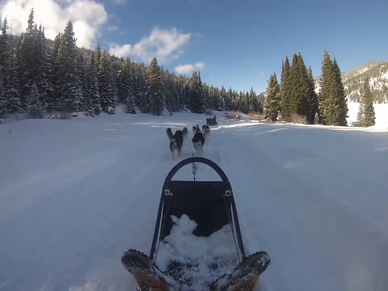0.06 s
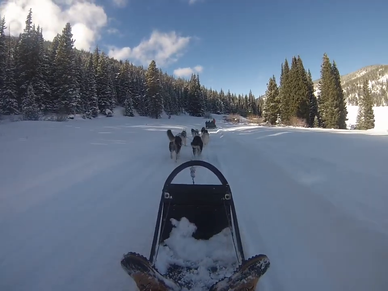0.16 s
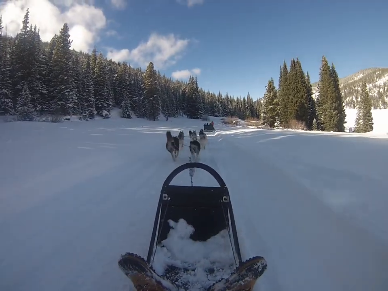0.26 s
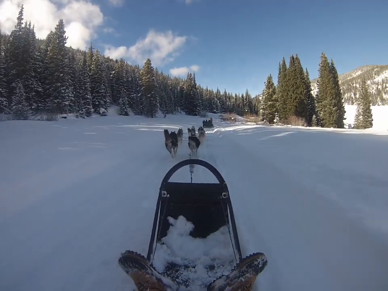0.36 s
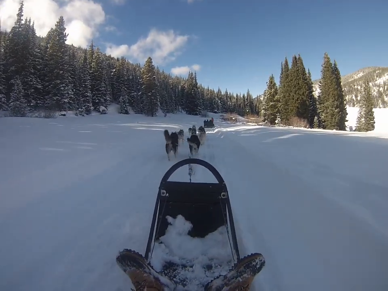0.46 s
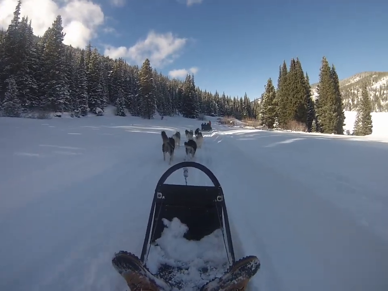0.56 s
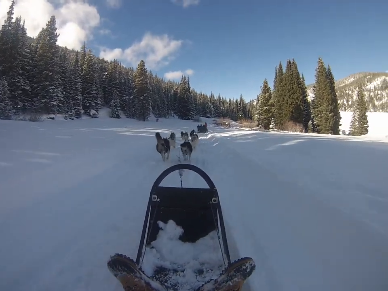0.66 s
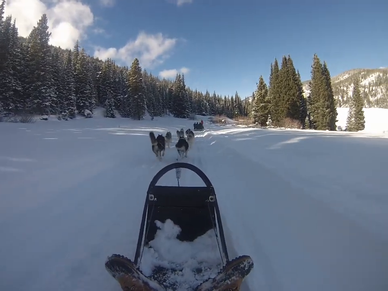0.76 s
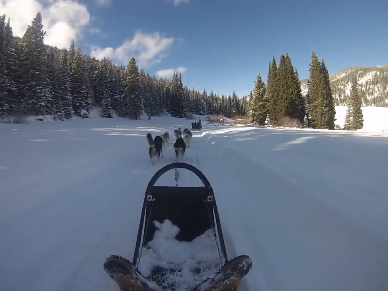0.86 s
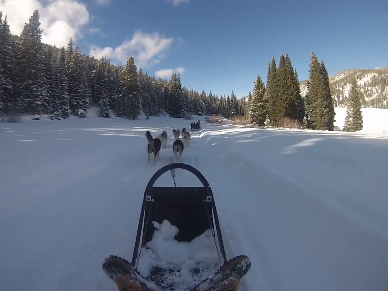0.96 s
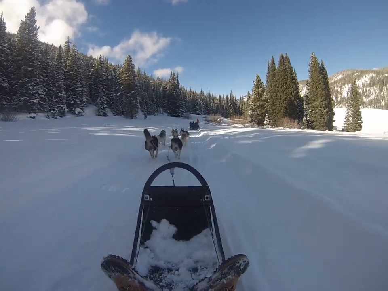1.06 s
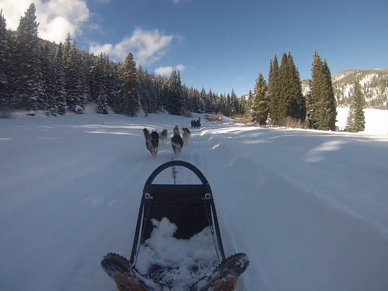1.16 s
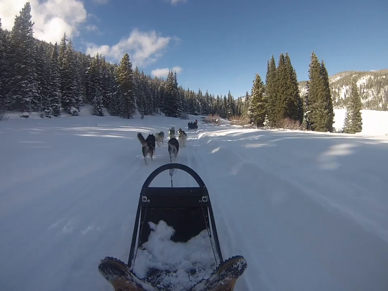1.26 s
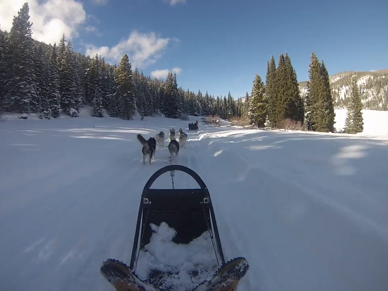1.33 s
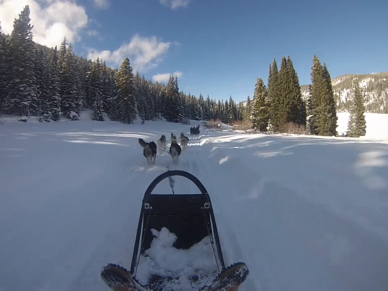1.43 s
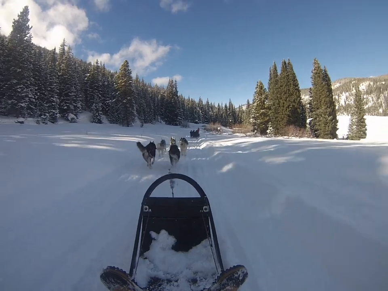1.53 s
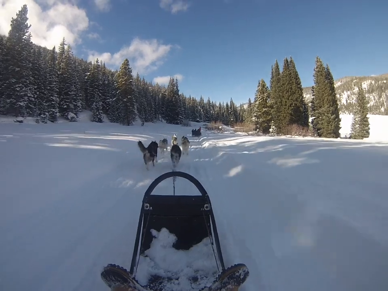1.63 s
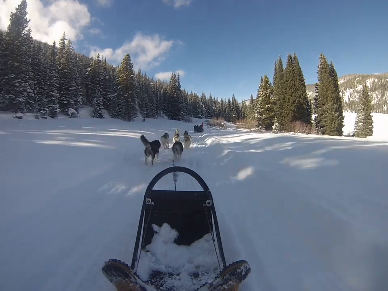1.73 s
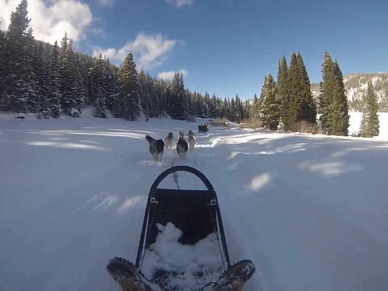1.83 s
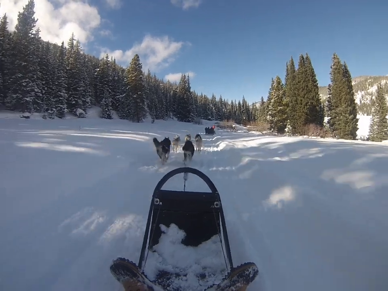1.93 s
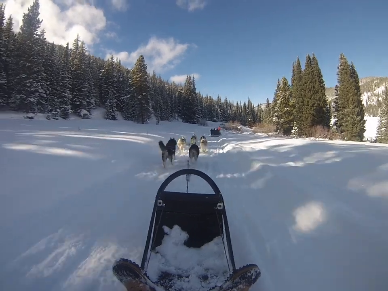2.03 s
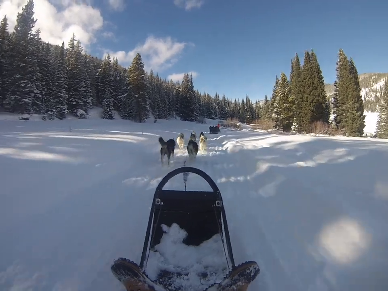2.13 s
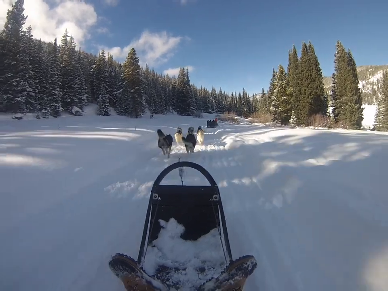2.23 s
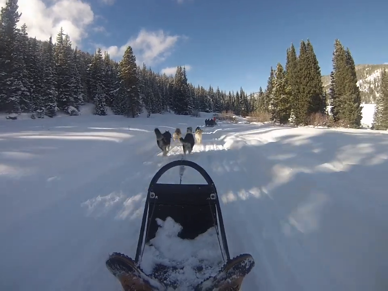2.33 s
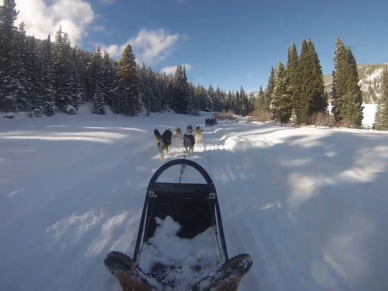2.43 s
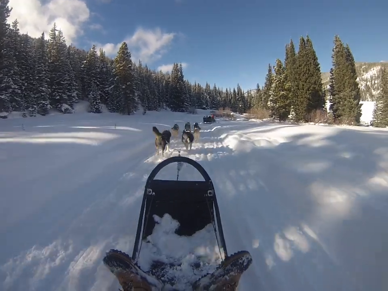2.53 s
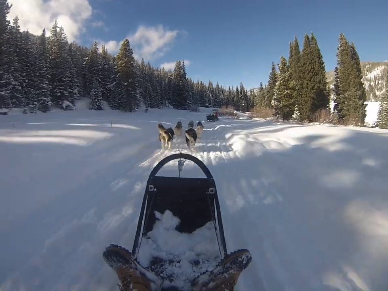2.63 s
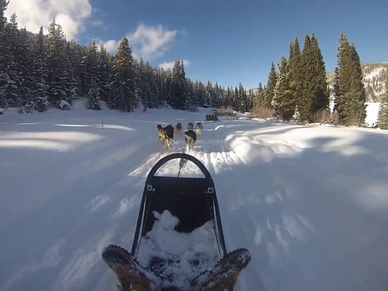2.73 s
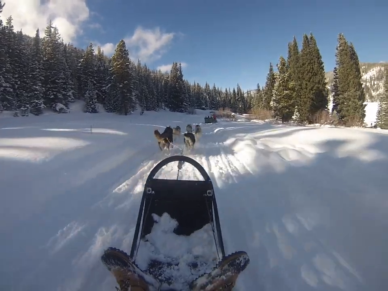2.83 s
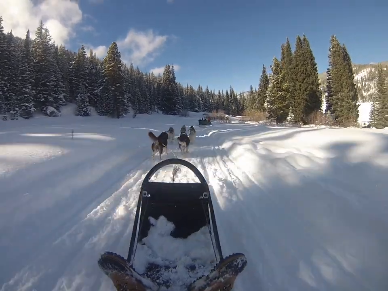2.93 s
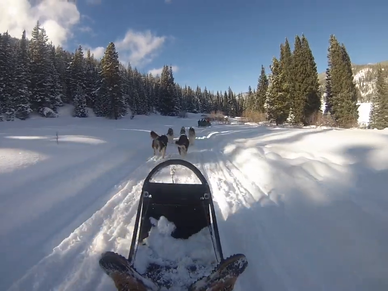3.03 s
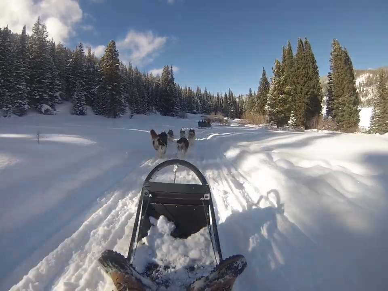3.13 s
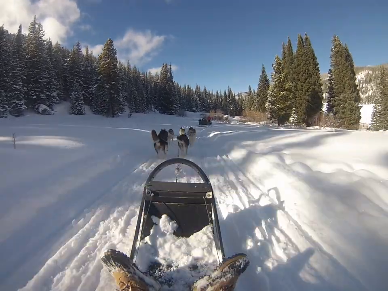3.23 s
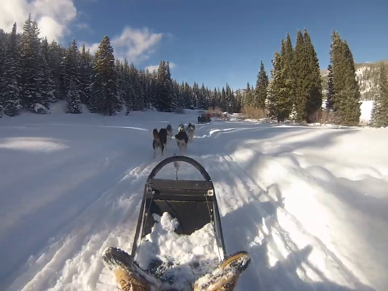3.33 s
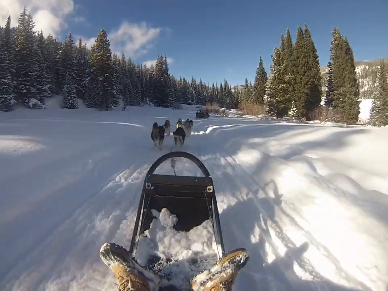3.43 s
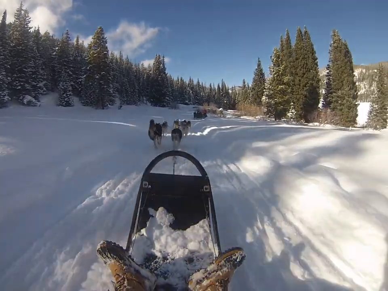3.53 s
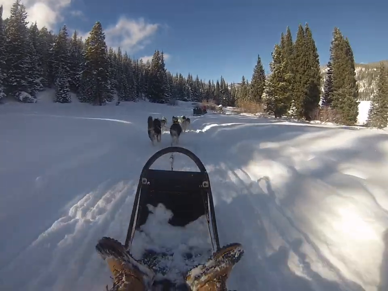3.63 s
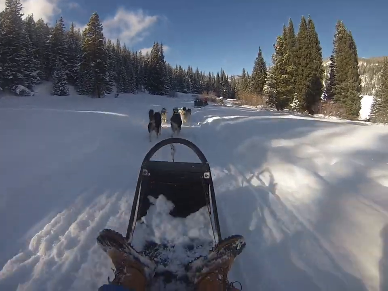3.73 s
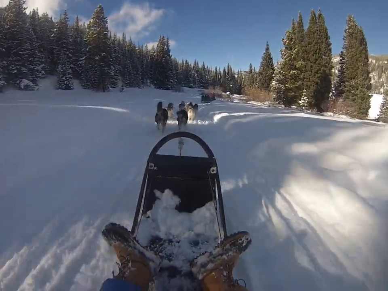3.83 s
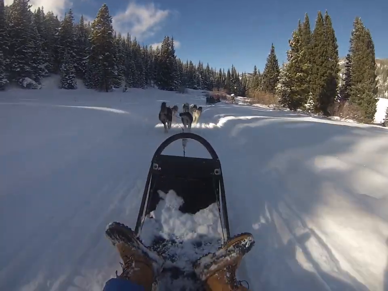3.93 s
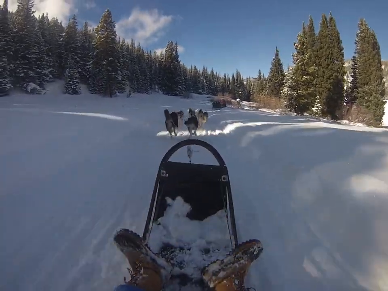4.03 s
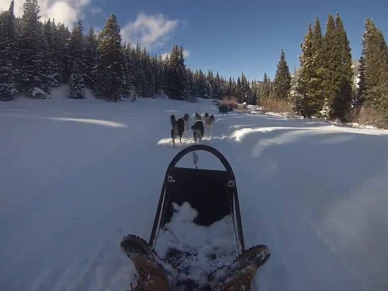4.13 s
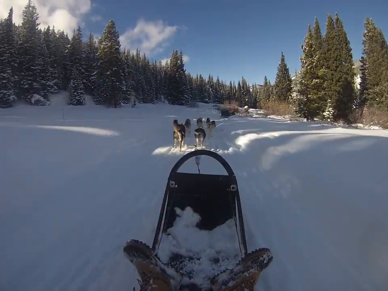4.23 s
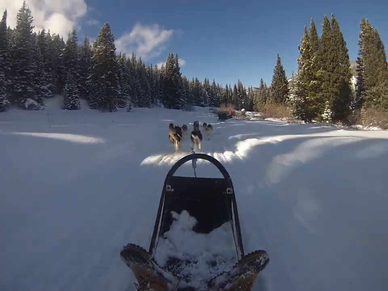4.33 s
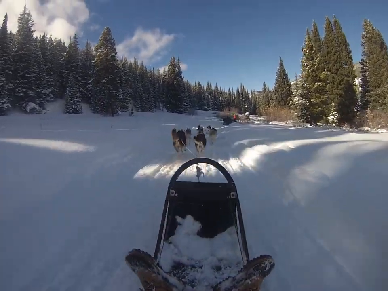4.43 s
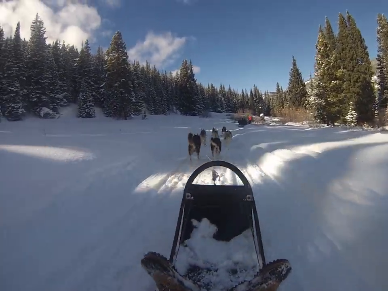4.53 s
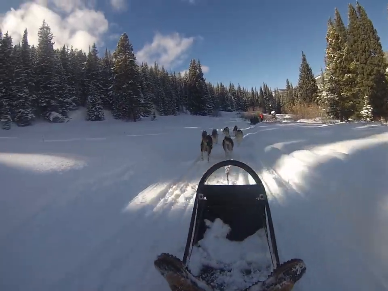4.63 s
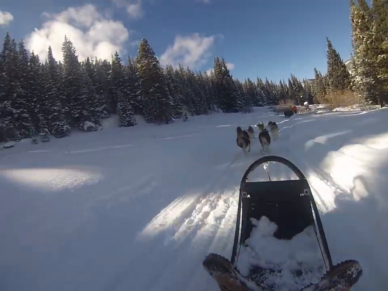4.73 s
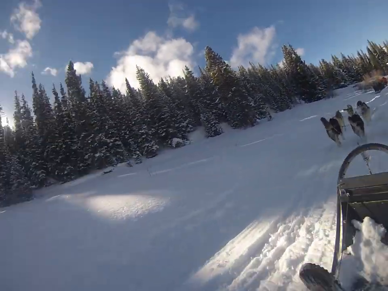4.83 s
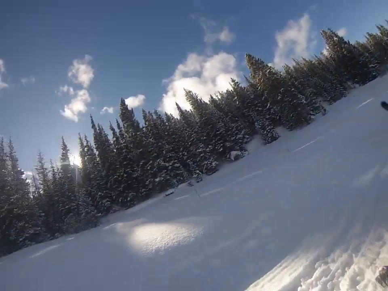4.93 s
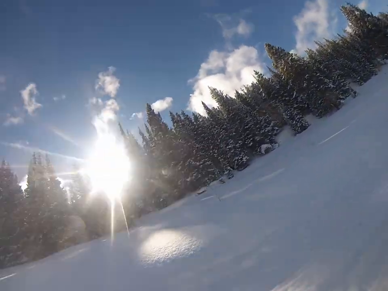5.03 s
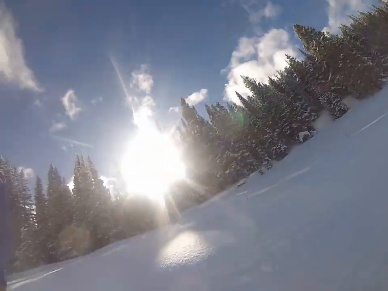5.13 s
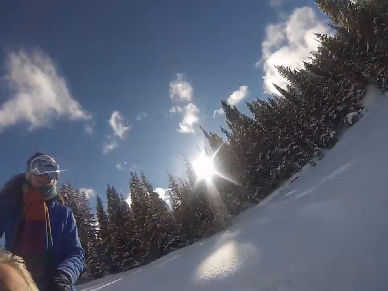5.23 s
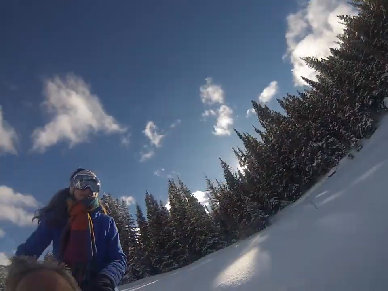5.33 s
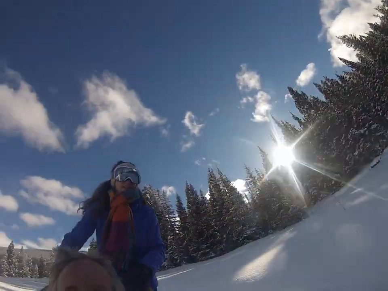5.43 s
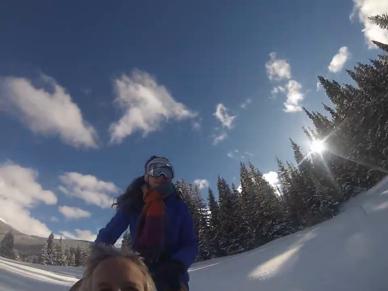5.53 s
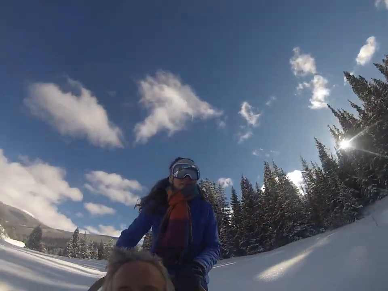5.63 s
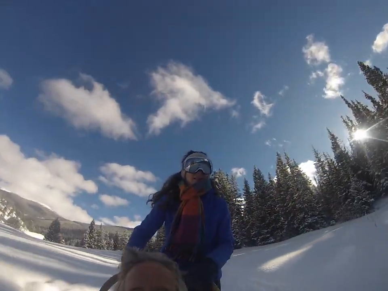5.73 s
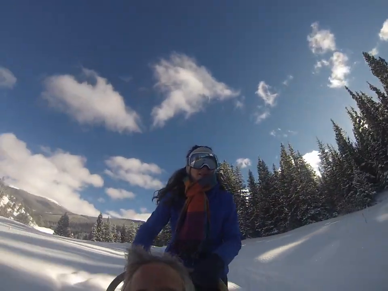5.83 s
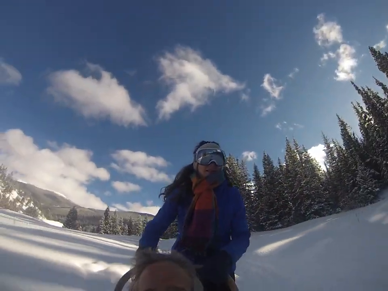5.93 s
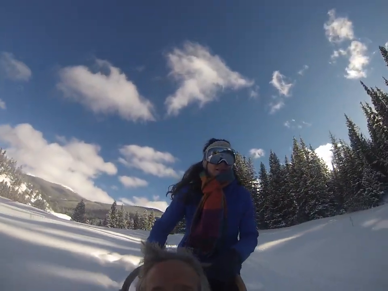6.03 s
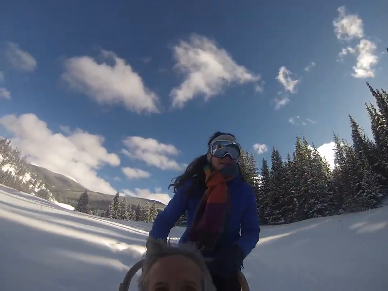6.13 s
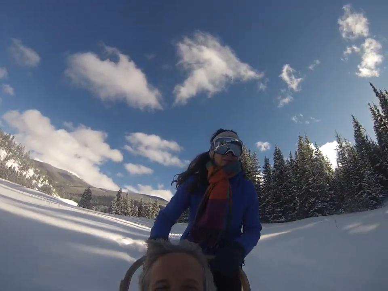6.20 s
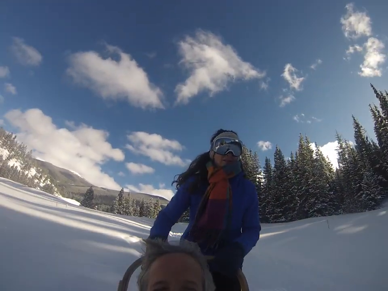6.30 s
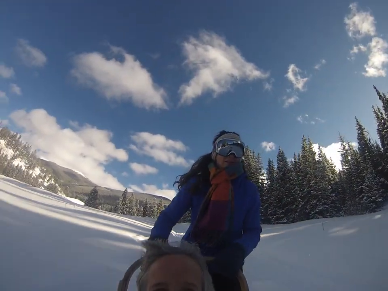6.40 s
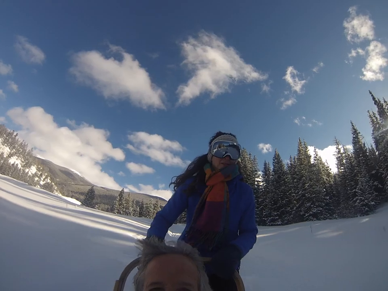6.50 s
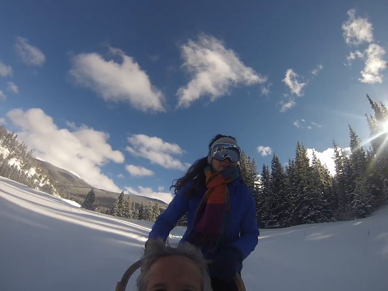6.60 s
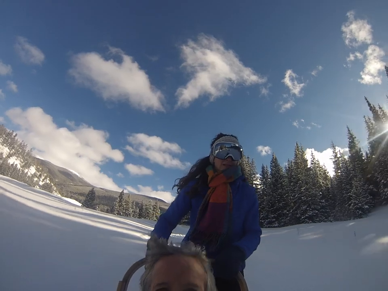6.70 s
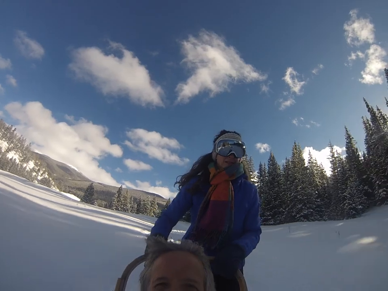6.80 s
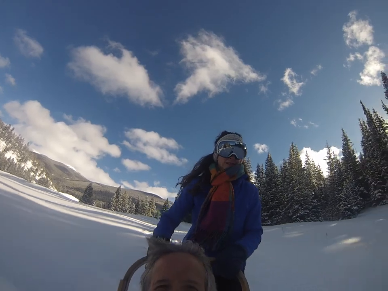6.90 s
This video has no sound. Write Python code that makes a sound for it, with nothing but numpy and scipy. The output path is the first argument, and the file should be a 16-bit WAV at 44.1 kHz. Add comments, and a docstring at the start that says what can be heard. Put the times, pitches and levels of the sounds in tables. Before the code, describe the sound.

A dog sled travels over packed snow, heard close from a small plastic-cased camera on board. For all seven seconds the runners make a grainy, wavering scrape and crunch over a low rumble, with a faint high hiss and tiny ticks. Soft, deep bumps and light knocks on the case come irregularly. Around 1.8 seconds one runner rings faintly on a hard patch.

From about 4.3 seconds the rumble swells as the camera is swung round. Between 4.7 and 6.1 seconds a glove slides, rasps and knocks on the case right at the microphone. Heavy low thumps come with it, loudest at 4.9 and 5.2 seconds, with smaller ones at 5.4 and 5.6. The case creaks briefly at about 6 seconds. The scrape and rumble then continue, slightly softer, with a couple of small bumps and a last light knock near 6.9 seconds.

```python
"""A trail of packed snow, from on board a dog sled; the microphone is in a small plastic-cased camera.
Close by, the runners crush snow grains and the frame rumbles, under a faint hiss with tiny ticks.
Bumps set the camera mount ringing, the case takes a few knocks, and one runner sings on a hard patch.
Near five seconds the camera is swung round to face backwards: right at the microphone a glove slides,
rubs and knocks on the case, which creaks under the fingers as the turn ends."""
import sys
import numpy as np
from scipy import signal
from scipy.fft import rfft, irfft
from scipy.io import wavfile
from scipy.ndimage import uniform_filter1d

SR = 44100
rng = np.random.default_rng(int(sys.argv[2]) if len(sys.argv) > 2 else 0)


def generate_wav(sig):
    """Save sig (samples, or channels by samples) to the path in sys.argv[1] as 16-bit PCM at SR."""
    pcm = np.round(np.clip(np.atleast_2d(sig).T, -1, 1) * 32767).astype(np.int16)
    wavfile.write(sys.argv[1], SR, pcm)


N = 306936
TIME, FREQS = np.arange(N) / SR, np.fft.rfftfreq(N, 1 / SR)
TURN_START_S, TURN_END_S = 4.03, 6.25
TURNED = np.clip((TIME - TURN_START_S) / (TURN_END_S - TURN_START_S), 0, 1)  # 0 ahead, 1 behind

# softer and harder snow under the runners: time_s, scrape_db, crunch_db
SNOW_COURSE = [(0, -54, -57.5), (.2, -55.5, -63.5), (.7, -56.5, -58.5), (.97, -53.5, -57),
               (1.4, -55, -58.5), (1.58, -59, -65), (1.87, -53.5, -60.5), (2.4, -56, -61.5),
               (3.35, -56, -62.5), (3.8, -56.5, -60.5), (4.12, -57.5, -66.5), (4.8, -53.5, -54),
               (5.15, -59.5, -64.5), (5.55, -53.5, -55), (5.95, -57, -56.5), (6.2, -59, -61),
               (6.96, -58.5, -62)]


def gain_of(db):
    """Decibels to amplitude."""
    return 10 ** (np.asarray(db) / 20)


def unit_rms(x):
    """Scales to an rms of one."""
    return x / np.sqrt(np.mean(x ** 2) + 1e-20)


def snow_gains():
    """The scrape and crunch gains along the trail, for every sample."""
    time_s, scrape_db, crunch_db = np.transpose(SNOW_COURSE)
    return gain_of(np.interp(TIME, time_s, scrape_db)), gain_of(np.interp(TIME, time_s, crunch_db))


def add(mix, start_s, sound):
    """Mixes a sound in at a time."""
    part = mix[max(round(start_s * SR), 0):][:len(sound)]
    part += sound[:len(part)]


def drift(rate_hz):
    """Random wandering of rms one, up to about the given rate."""
    return unit_rms(irfft(rfft(rng.standard_normal(N)) / (1 + (FREQS / rate_hz) ** 4), N))


def coloured_noise(spectrum):
    """Noise of rms one, shaped by a smooth spectrum."""
    hz, db = np.transpose(spectrum)
    shape = gain_of(np.interp(np.log(FREQS + 1), np.log(hz + 1), db))
    return unit_rms(irfft(rfft(rng.standard_normal(N)) * shape, N))


def resonated(x, rings, low_hz, high_hz):
    """Filters by a bank of steep-sided resonances and cuts outside a band; the result has rms one."""
    power = sum(gain_of(db) ** 2 / (1 + (1.43 * (FREQS - hz) / width_hz) ** 2) ** 1.73
                for hz, width_hz, db in rings)
    band = signal.butter(4, [low_hz, high_hz], "bandpass", fs=SR, output="sos")
    return unit_rms(signal.sosfilt(band, irfft(rfft(x) * np.sqrt(power), N)))


def grains(per_s, spread_db, smooth):
    """Tiny fractures of uneven size over a smooth sliding noise."""
    size = gain_of(spread_db * np.minimum(rng.exponential(1, N), 4))
    clicks = size * rng.choice([-1, 1], N) * (rng.random(N) < per_s / SR)
    return unit_rms(unit_rms(clicks) + smooth * rng.standard_normal(N))


def steadied(x, window_s):
    """Takes the slow swells out of a noise, so that a level curve governs it."""
    return x / np.sqrt(np.abs(uniform_filter1d(x ** 2, int(window_s * SR))) + 1e-3)


def ring(modes, tilt_db_per_octave=0):
    """Decaying modes struck once."""
    t = np.arange(SR // 2) / SR
    return sum(gain_of(db + tilt_db_per_octave * np.log2(hz / modes[0][0]))
               * np.exp(-np.log(1000) * t / t60_s) * np.sin(2 * np.pi * hz * t)
               for hz, db, t60_s in modes)


def swell(middle_s, length_s):
    """A smooth rise and fall round a moment."""
    return np.exp(-(2 * (TIME - middle_s) / length_s) ** 2)


def flicker():
    """A quick, half-regular wavering of level."""
    flutter = unit_rms(sum(np.cos(2 * np.pi * (hz * TIME + rng.random()))
                           for hz in (20, 29.9, 40.3, 49.6)))
    return unit_rms(1 / (1 + np.exp(-1.1 * flutter - 1.7 * drift(87) + 1.0)))


def runners():
    """Snow grains break under the runners; the colour changes as the microphone turns away."""
    # resonances of the scrape facing ahead, facing behind, and of the crunch: pitch_hz, width_hz, level_db
    ahead_rings = [(1700, 210, -11), (1850, 58, 1), (2065, 150, -8.5), (2372, 85, -6.5), (2625, 130, -11.5),
                   (2830, 105, -8.5), (3320, 130, -15), (3740, 150, -18.5), (4660, 300, -22.5)]
    behind_rings = [(1744, 194, -2), (1780, 73, -15), (2110, 100, -14), (2380, 90, -16), (2640, 160, -15.5),
                    (3550, 230, -20), (4740, 620, -24)]
    crunch_rings = [(706, 145, -1.5), (995, 96, 0), (1263, 260, -4.5)]
    scrape_gain, crunch_gain = snow_gains()
    pressure = gain_of(1.07 * drift(35) + drift(7.6))  # small patches in the snow swell and fade it
    ahead = resonated(grains(per_s=2200, spread_db=1.1, smooth=0.34), ahead_rings, 1080, 7000)
    behind = resonated(grains(1200, 0.55, 0.66), behind_rings, 1500, 5700)
    scrape = (np.sqrt(1 - TURNED) * ahead + np.sqrt(TURNED) * behind) * scrape_gain
    crunch = resonated(grains(900, 4.8, 0.99), crunch_rings, 512, 1700) * crunch_gain
    return pressure * (gain_of(-0.5) * scrape + gain_of(-1.5) * crunch)


def ride():
    """Lumpy snow sways the sled, shakes the mount and drums on the frame; a hand adds to the motion."""
    # spectrum of the slow sway: frequency_hz, level_db
    sway_spectrum = [(3, -12.5), (7, 7), (12, 6.5), (20, -2), (35, -5.5), (52, -13.5), (70, -23.5),
                     (100, -43), (160, -32), (400, -100)]
    # resonances of the sled frame: pitch_hz, width_hz, level_db
    frame_rings = [(118.4, 54, -1.5), (199.2, 36.3, 1.5), (249.5, 29, -5.5), (319.7, 47, -4),
                   (366, 42, -6.5), (445, 71, -8)]
    lumps_hz = 4.4
    _, crunch_gain = snow_gains()
    handling = np.interp(TIME, [4.31, 5.32, 6.3], [0, 1, 0])  # how briskly the hand moves the camera
    turned_db = -2 * TURNED  # sway and rumble are weaker facing backwards
    sway = steadied(coloured_noise(sway_spectrum), 0.093)
    shake = steadied(resonated(grains(90, 2.8, 0.69), [(82.8, 14, 0)], 54.5, 123.7), 0.17)
    rumble = resonated(grains(260, 1.96, 0.8), frame_rings, 109, 660)
    rumble *= unit_rms(crunch_gain ** 0.27)  # loosely follows the crunch
    return (sway * gain_of(-41 + 14 * handling + turned_db + 2 * drift(lumps_hz))
            + shake * gain_of(-49.5 + 5 * handling + 3 * drift(lumps_hz))
            + rumble * gain_of(-55.5 + turned_db + drift(lumps_hz)))


def hiss_and_fizz():
    """A faint steady hiss, and a high fizz whose lower and upper parts flicker separately."""
    # spectra of the hiss and the fizz: frequency_hz, level_db
    hiss_spectrum = [(2000, 6), (4000, -0.5), (5500, -2), (6400, -3), (7700, -0.5), (8400, -5),
                     (9900, -0.5), (10800, -4), (11300, 0), (12200, -4), (14300, -7.5), (15300, -10)]
    fizz_spectrum = [(4000, -30), (6000, -10), (8400, -13), (9400, 0), (10100, 2), (10800, -9), (11400, -6),
                     (12200, -10), (13300, -6), (14300, -6), (15300, -18)]
    split_hz = 11800
    fizz = coloured_noise(fizz_spectrum)
    lower = irfft(rfft(fizz) * (FREQS < split_hz), N)
    hiss = coloured_noise(hiss_spectrum)
    flickering = lower * flicker() + (fizz - lower) * flicker()
    return gain_of(-65) * hiss + gain_of(-70.5) * flickering


def ticks(per_s=40):
    """Tiny high ticks lie half buried in the hiss."""
    # the ring of one tick: pitch_hz, level_db, t60_s
    tick_modes = [(6020, 0, .016)]
    taps = rng.uniform(0.4, 1, N) * (rng.random(N) < per_s / SR)
    return gain_of(-82.5) * unit_rms(signal.fftconvolve(taps, ring(tick_modes))[:N])


def bumps():
    """Each soft push leaves the mount ringing; a heavy one heaves the whole camera."""
    # bumps that reach the mount, deeper as the tilt falls: start_s, peak_db, tilt_db_per_octave
    jolts = [(0.201, -30.5, -17), (0.53, -32.5, -34), (1.03, -37, 8), (1.38, -36.5, 3), (1.67, -38.5, 6),
             (2.54, -35.5, 25), (2.756, -28.5, -21), (2.859, -29.5, -4.5), (3.533, -37.5, 6),
             (3.802, -31.5, -9), (4.17, -29.5, 2), (4.584, -37.5, -3), (4.677, -27.5, 3),
             (4.861, -19.5, 10), (4.896, -10.5, 7), (5.172, -11.5, -13.5), (5.385, -18.5, -4),
             (5.622, -18.5, 6), (5.921, -26.5, 9), (6.055, -25.5, 4), (6.274, -36, -4), (6.675, -36, 0)]
    # modes of the mount: pitch_hz, level_db, t60_s
    mount_modes = [(40.2, -8.5, 0.265), (58.4, -12, 0.057), (82.64, 4, 0.27), (150, -20, 0.13)]
    out, push = np.zeros(N), signal.windows.hann(int(0.01 * SR))
    for start_s, peak_db, tilt in jolts:
        thud = signal.fftconvolve(ring(mount_modes, tilt), push)
        add(out, start_s, gain_of(peak_db) * thud / abs(thud).max())
    return out


def knocks():
    """A brief gritty contact rings the case; each knock has its own dull or bright colour."""
    # sharp blows on the case: start_s, peak_db, favoured_hz, contact_s
    blows = [(.78, -43, 900, .012), (1.024, -38.5, 1700, 0.0066), (1.654, -37, 1900, 0.0035),
             (2.241, -42.5, 900, 0.01), (2.718, -39, 1850, 0.011), (3.311, -42, 1900, 0.009),
             (4.308, -39, 1300, 0.0029), (4.839, -38, 1600, 0.0024), (5.173, -29, 473, 0.0046),
             (5.176, -33.5, 2600, 0.0035), (5.384, -35, 6000, 0.0048), (5.646, -35, 1000, 0.0023),
             (5.719, -35.5, 450, 0.0048), (5.984, -31, 950, .004), (6.881, -35, 1070, 0.0043)]
    # modes of the case: pitch_hz, level_db, t60_s
    case_modes = [(352, 2.5, 0.051), (520, 1, 0.013), (700, 1, 0.01), (945, 1, 0.041), (1240, 1, 0.017),
                  (1832, 6.5, 0.035), (2330, -5, 0.012), (2640, -27, 0.009), (3550, -0.5, 0.012),
                  (5170, 0, 0.0039), (7300, 0, 0.0071)]
    out, t = np.zeros(N), np.arange(SR // 25) / SR
    for start_s, peak_db, favoured_hz, contact_s in blows:
        contact = 0.12 * rng.standard_normal(len(t)) * np.exp(-(t / contact_s) ** 2)
        contact[0] = 2  # the impact, ahead of the grit
        modes = [(hz, db - 8 * abs(np.log2(hz / favoured_hz)), t60_s) for hz, db, t60_s in case_modes]
        knock = signal.fftconvolve(ring(modes), contact)
        add(out, start_s, gain_of(peak_db) * knock / abs(knock).max())
    return out


def singing_runner():
    """A patch of hard snow makes a runner ring above its usual note."""
    # resonances of the runner: pitch_hz, width_hz, level_db
    runner_rings = [(2120, 150, 4), (2840, 74, -3), (3330, 120, -6)]
    note = resonated(grains(2200, 1.3, 0.6), runner_rings, 1700, 4300)
    return gain_of(-62.5) * note * swell(middle_s=1.8, length_s=0.55)


def stroke(start_s, length_s, swell_db, attack_s=0.034, release_s=0.019):
    """The glove gets up to speed, presses harder or eases off as it slides, and comes to rest."""
    t = TIME - start_s
    pressing = gain_of(swell_db * (np.clip(t / length_s, 0, 1) - 0.5))
    return np.clip(t / attack_s, 0, 1) * pressing * np.exp(-np.maximum(t - length_s, 0) / release_s)


def glove():
    """Right at the microphone, cloth hisses along the case, and rasps and groans where it catches."""
    # slides along the case: start_s, length_s, level_db, swell_db, sizzle_relative_db, favoured_hz
    strokes = [(4.714, 0.22, -53.5, 2, -16.5, 7500), (4.949, 0.25, -55.5, 6, -15.5, 5200),
               (5.191, 0.13, -52.5, 0, -10, 5200), (5.374, 0.26, -57.5, -11, -11.5, 7300),
               (5.625, 0.2, -57, -4, -19, 4600), (5.83, 0.214, -65.5, 6, -25, 3600)]
    # catches on the case: middle_s, level_db, length_s, groan_relative_db
    catches = [(4.919, -49.5, 0.021, -5), (4.966, -50.5, 0.015, -8), (5.299, -48.5, 0.027, 7),
               (5.409, -44, 0.044, -8), (5.669, -42.5, 0.035, 2.5), (5.958, -58, 0.069, 13),
               (6.118, -63, .02, 0)]
    # resonances of the case under the cloth: pitch_hz, width_hz, level_db
    slide_rings = [(1070, 270, 5.5), (1870, 490, 4.5), (2440, 450, 2.5), (3570, 240, -2), (4260, 410, -1),
                   (5220, 530, 0), (7230, 1080, -3.5)]
    sizzle_rings = [(11100, 1000, 5), (12200, 700, -4)]
    rasp_rings = [(354, 340, -1.5), (745, 62, -1), (950, 94, 3), (1170, 150, -1.5), (1670, 660, -1),
                  (2150, 120, -6)]
    groan_rings = [(113, 22, -3.5), (149, 19, -4.5), (305, 26, -24)]
    lift_db, lift_width_hz = 3, 700
    slide_spectrum = rfft(resonated(grains(5000, 2.5, 0.48), slide_rings, 700, 8400))
    sizzle = resonated(grains(5000, 3.1, 0.8), sizzle_rings, 8700, 14000)
    rasp = steadied(resonated(grains(550, 4.4, 0.97), rasp_rings, 270, 3400), 0.0125)
    groan = steadied(resonated(grains(160, 1.7, 0.5), groan_rings, 78, 490), 0.06)
    out = np.zeros(N)
    for start_s, length_s, db, swell_db, sizzle_db, favoured_hz in strokes:
        lift = gain_of(lift_db * np.exp(-((FREQS - favoured_hz) / lift_width_hz) ** 2))
        hiss = unit_rms(irfft(slide_spectrum * lift, N))
        out += gain_of(db) * stroke(start_s, length_s, swell_db) * (hiss + gain_of(sizzle_db) * sizzle)
    for middle_s, db, length_s, groan_db in catches:
        out += gain_of(db) * swell(middle_s, length_s) * (rasp + gain_of(groan_db) * groan)
    return out


def creak():
    """The case sticks and slips unevenly under the fingers as the turn ends."""
    # course of the creak: time_s, level_db, slips_per_s
    course = [(5.92, -45.5, 119), (5.966, -44, 151), (5.999, -39, 138), (6.023, -43.5, 168),
              (6.049, -45, 150), (6.066, -55, 190)]
    # resonances of the juddering case: pitch_hz, width_hz, level_db
    judder_rings = [(141, 28, 15.5), (315, 56, 3.5), (708, 53, 2), (1184, 75, -3.5), (1920, 64, -5),
                    (2113, 86, -4.5)]
    time_s, level_db, slips_per_s = np.transpose(course)
    uneven_rate = np.interp(TIME, time_s, slips_per_s) * np.exp(0.4 * drift(120))
    slip_count = np.floor(np.cumsum(uneven_rate) / SR)
    slips = np.diff(slip_count, prepend=0) * gain_of(2.4 * rng.standard_normal(N))
    judder = resonated(unit_rms(slips) + 0.85 * rng.standard_normal(N), judder_rings, 110, 2400)
    return steadied(judder, 0.036) * np.interp(TIME, time_s, gain_of(level_db), left=0, right=0)


def scene():
    """Sled, camera case and faint treble, all at the one microphone."""
    sled = runners() + singing_runner() + ride() + bumps()
    case = knocks() + glove() + creak()
    return (sled + case + ticks() + hiss_and_fizz())[None]


def record(dry):
    """The camera cuts off the treble above 15.3 kHz."""
    lowpass = signal.firwin(801, 15300, window=("kaiser", 9), fs=SR)
    return signal.oaconvolve(dry, lowpass[None], "same")


dry = scene()
out = record(dry)
generate_wav(out)
```